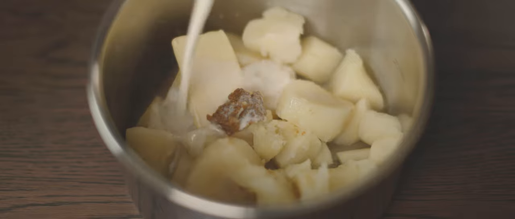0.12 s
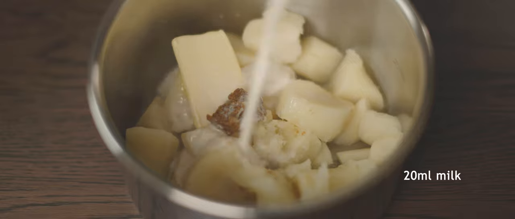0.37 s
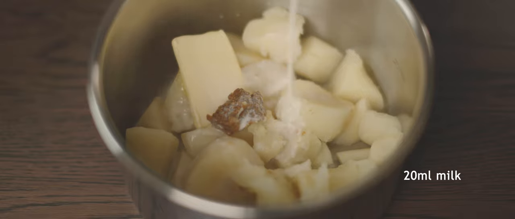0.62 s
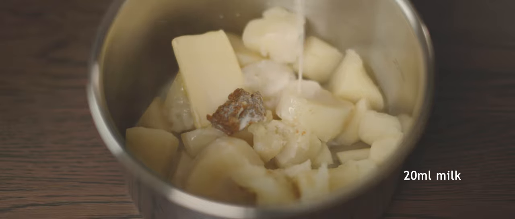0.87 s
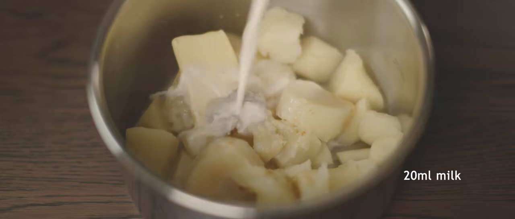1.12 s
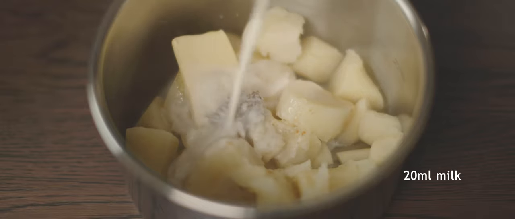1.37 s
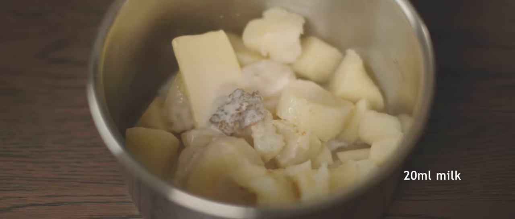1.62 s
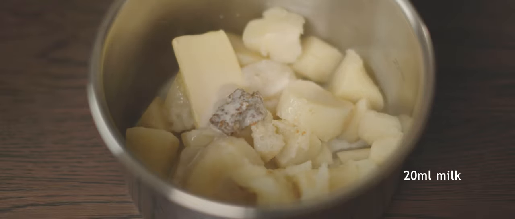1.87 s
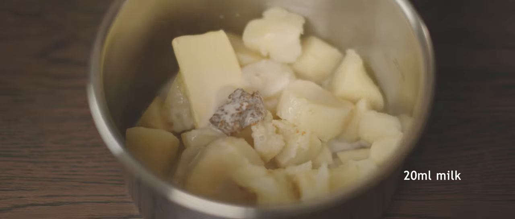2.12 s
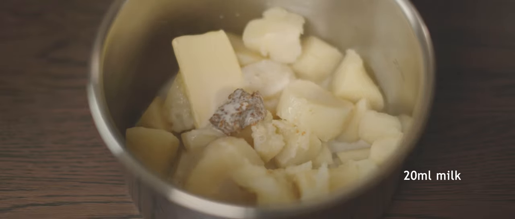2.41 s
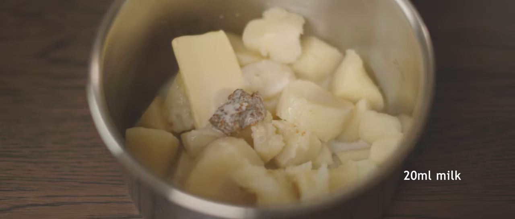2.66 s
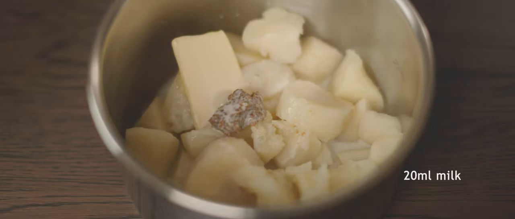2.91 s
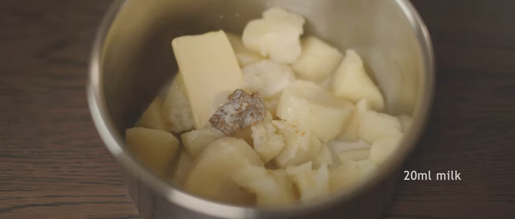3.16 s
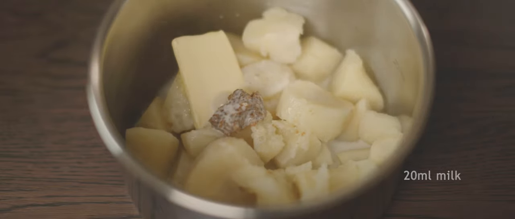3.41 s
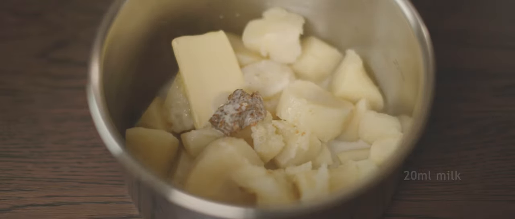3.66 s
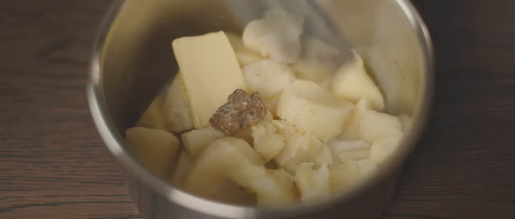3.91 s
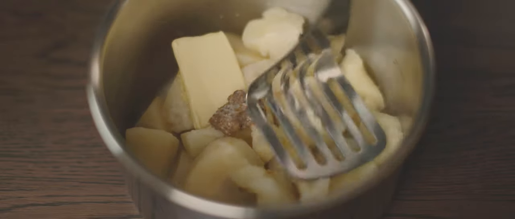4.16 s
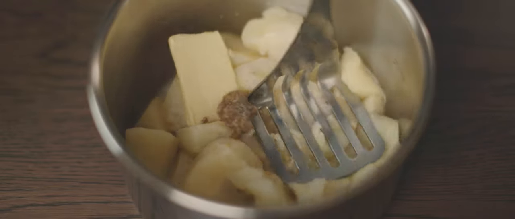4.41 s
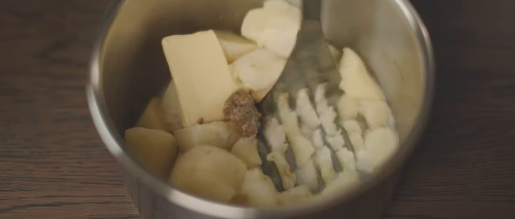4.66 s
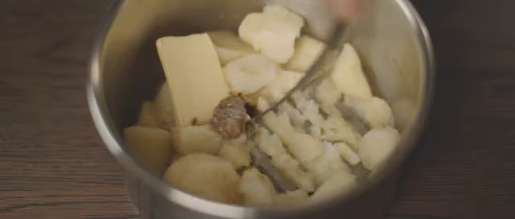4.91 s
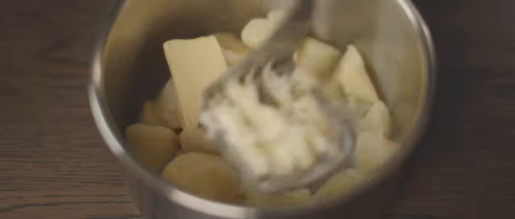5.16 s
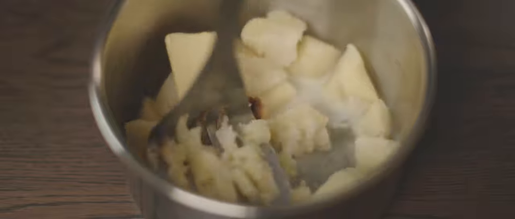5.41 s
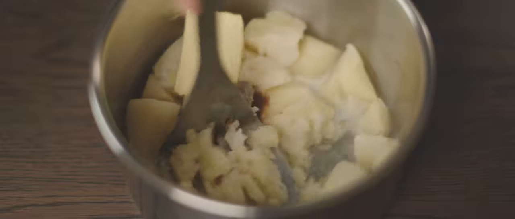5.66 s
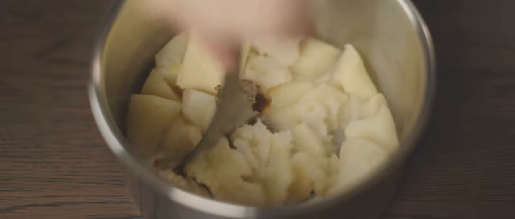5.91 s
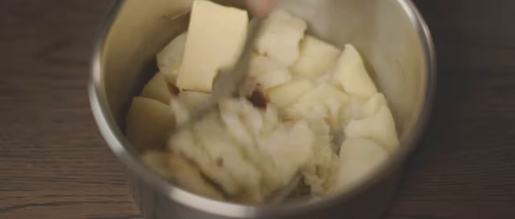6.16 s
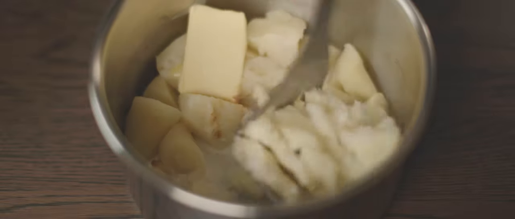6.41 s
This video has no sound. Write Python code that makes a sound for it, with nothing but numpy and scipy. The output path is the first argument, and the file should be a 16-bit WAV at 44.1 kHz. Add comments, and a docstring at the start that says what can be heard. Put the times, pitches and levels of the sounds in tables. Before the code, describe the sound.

Close, mono, in a small kitchen with soft air, hiss and low rumble. A faint steady appliance tone around the low mids is heard until about 3.7 s. From 0.1 to 0.9 s milk trickles onto soft boiled vegetables in a steel saucepan: bright ringing plips, fine wet crackle and tiny snaps. A sparser trickle follows from 1.1 to 1.8 s, with dull bumps from 1.6. From 2.2 to 3.6 s things shuffle on the wooden table, dull and scratchy, with a distinct knock at 3.15. It is nearly quiet until faint wet ticks from 4.2. At 4.7 s a masher strikes the pan with a very loud crack and table boom, then scrapes and squashes until 5.2. A lighter tap comes at 5.28, a ringing clank at 5.48, and wet squishing leads to a strong, bassier knock at 5.87. Soft squelches and scraping around 6.15 fade, with a faint thump at 6.4.

```python
"""Milk trickles over soft boiled vegetables in a steel saucepan: ringing bubbles, fine wet crackle and snapping films.
Then things are shuffled and knocked on the wooden table beside it: uneven noise, dull in its body, scratchy on top.
Then a slotted masher knocks the pan, making cracks, ringing modes and noisy tails, scrapes its wall and squashes
the vegetables with more bubbles, while jolts make the table boom. Air, hiss and a low rumble run throughout
in the small kitchen; a faint appliance tone is mostly heard early. Close and mono."""
import sys
import numpy as np
from scipy import signal
from scipy.fft import rfft, irfft
from scipy.io import wavfile

SR = 44100
rng = np.random.default_rng(int(sys.argv[2]) if len(sys.argv) > 2 else 0)


def unload_wav(signal):
    """Save mono or channel-first audio to the path in sys.argv[1] as 16-bit WAV at rate SR, clipped to [-1, 1]."""
    wavfile.write(
        sys.argv[1],
        SR,
        np.round(np.clip(np.atleast_2d(signal).T, -1, 1) * 32767).astype(np.int16),
    )


def boost_factor(decibels):
    """Convert a level in decibels to a linear amplitude factor."""
    exponent = np.asarray(decibels, float) / 20
    return 10 ** exponent


N = 288855
TIME = np.arange(N) / SR

# gushes of fine wet crackle, from trickling milk and squashed mash; a fall of 0 or less is immediate:
# peak_s, level_db, rise_s (per 20 dB), fall_s (per 20 dB)
GUSHES = [(0.144, -51.5, .03, .09), (0.252, -37.5, 0.081, 0.0538), (0.32, -47.5, .1, .015),
          (0.375, -49, .04, 0.01), (0.4, -35.5, 0.015, .012), (0.453, -36.5, 0.0025, 0.0171),
          (0.565, -41, 0.027, 0.03), (0.638, -49.5, 0.072, .035), (1.11, -48.5, .04, 0.05),
          (1.218, -56, 0.037, .08), (1.392, -56, 0.17, -0.1), (1.5, -56.5, 0.23, 0),
          (1.592, -40.5, 0.078, 0.06), (1.638, -37, 0.0063, .09), (4.532, -58.5, .12, 0.1),
          (4.636, -54, .035, 0.16), (5.726, -60, 0.13, 0.1), (5.818, -42, 0.063, .02),
          (6.126, -50.5, 0.18, .025), (6.176, -40, 0.036, .01)]
# ways the pan rings: pitch_hz, level_db, t60_s (time to fade 60 dB)
PAN_MODES = [(1041, -6, 0.5), (1380, -12, .25), (1760, -6, 0.2), (2300, -7, .15), (2450, -5.5, 0.29),
             (3360, 1.5, .2), (3650, -8.5, .15), (3990, -9.5, .25), (4500, -0.5, 0.1), (4920, -4, 0.35),
             (5313, -13.5, .3), (5680, -3, 0.16), (6330, -6.5, 0.41), (6460, -5.5, 0.23), (7000, -13.5, .2),
             (7800, -3.5, 0.11), (8473, -17.5, 0.21), (8900, -10.5, .25), (10340, -9, 0.15),
             (12400, -14, .14)]
# ways the masher blade rings: pitch_hz, level_db, t60_s
BLADE_MODES = [(1284, 8.5, 0.027), (623.6, -13, 0.074), (792, -5.5, 0.049), (954, -3.5, 0.046),
               (1680, -9.5, 0.015), (2296, -10, 0.033)]


def pops():
    """Each larger bubble rings like a small spring, with a wet splat round its pitch; films snap on top."""
    # larger bubbles bursting as milk lands, then in the mash; levels before the cuts below:
    # start_s, level_db, pitch_hz, cycles (ringing before it fades to about a third, at most 6 used)
    bubble_rows = [(0.1276, -40, 3070, 3), (0.143, -31, 5370, 2), (0.1445, -33, 3040, 8),
                   (0.154, -23.5, 4700, 2.1), (0.188, -29.5, 2400, 9.7), (0.2074, -23.5, 4200, 4),
                   (0.2377, -23, 2700, 1.6), (0.244, -24, 2410, 3.3), (0.2853, -29.5, 1860, 12),
                   (0.328, -32, 4230, 4), (0.351, -28.5, 3080, 3.2), (0.3647, -28, 2360, 1.9),
                   (0.3856, -31, 2300, 1.5), (0.398, -12, 2350, 7.7), (0.4532, -15.5, 3060, 2.6),
                   (0.528, -29.5, 6140, 6.7), (0.552, -20, 6130, 1.9), (0.5583, -28.5, 1690, 7.3),
                   (0.6023, -21, 3760, 11), (0.6305, -18.5, 3010, 10.4), (0.656, -18.5, 7000, 4.6),
                   (0.6997, -32.5, 5140, 4.3), (0.836, -40, 7700, 4.8), (0.8693, -14, 7340, 8.9),
                   (1.07, -34, 5800, 2), (1.095, -29, 6600, 6.3), (1.1266, -34.5, 2850, 3.1),
                   (1.1738, -43, 4130, 4), (1.1887, -42, 3560, 5.3), (1.2107, -36, 1700, 1.1),
                   (1.264, -36.5, 6270, 1.7), (1.277, -43.5, 1580, 4.8), (1.317, -40, 2050, 5.8),
                   (1.341, -34, 6440, 4), (1.3444, -40.5, 3460, 4.3), (1.3796, -33, 6600, 6.6),
                   (1.442, -34.5, 2450, 8.4), (1.51, -27.5, 6100, 2.1), (1.526, -31, 2420, 8),
                   (1.549, -28, 1380, 4), (1.5765, -19.5, 2720, 6.5), (1.592, -33, 1105, 7),
                   (1.6377, -25, 2000, 6.2), (1.6467, -37, 2090, 6.9), (1.6756, -25, 1860, 3.9),
                   (1.691, -24, 2820, 6.1), (1.7073, -19.5, 1187, 3.6), (1.8496, -20, 3130, 2.1),
                   (4.2306, -41, 3400, 3), (4.2707, -37.5, 5400, 1.4), (4.4423, -41.5, 4600, 3.5),
                   (4.4965, -37, 4570, 3.5), (4.527, -28.5, 5530, 4.4), (4.5367, -31.5, 5600, 3.9),
                   (4.5505, -42.5, 3300, 3), (4.6084, -40, 5450, 3.5), (4.6322, -25, 5500, 7.5),
                   (4.835, -27, 4020, 2.5), (4.872, -23, 4600, 3.5), (4.8994, -25, 6440, 4.4),
                   (4.927, -23.5, 2020, 1.8), (5.0038, -20, 5050, 1.2), (5.0686, -27.5, 6370, 3.1),
                   (5.0973, -44, 2660, 4.3), (5.1492, -40, 4770, 4), (5.162, -35.5, 6260, 4.3),
                   (5.1893, -43, 4660, 2.1), (5.686, -35.5, 3880, 4.5), (5.706, -33, 4670, 3.5),
                   (5.7225, -29, 6300, 2.7), (5.7413, -30.5, 3360, 3.5), (5.7688, -26, 6550, 2.3),
                   (5.8, -27.5, 4600, 3.5), (5.816, -24, 6300, 2.8), (6.0546, -30, 4260, 2.3),
                   (6.0866, -36.5, 3150, 5.2), (6.118, -31.5, 2450, 3.8), (6.1712, -20.5, 1690, 3.5),
                   (6.336, -42, 3020, 1.4)]
    # tiny treble ticks, from wet films snapping and from the bright edge of contacts:
    # start_s, peak_db, centre_hz
    tick_rows = [(0.117, -38, 15200), (0.1536, -37, 8810), (0.2053, -34, 8790), (0.2264, -36, 8600),
                 (0.25, -29, 9400), (0.18, -41, 10900), (0.3252, -40, 12700), (0.3506, -40, 10700),
                 (0.3655, -25.5, 11200), (0.375, -33, 12000), (0.4155, -40, 11000), (0.4704, -46, 8000),
                 (0.646, -40, 11000), (0.7847, -43, 9000), (0.5572, -42, 8590), (0.578, -24.5, 9300),
                 (0.6052, -20.5, 15000), (0.6969, -28, 14600), (0.8365, -39.5, 8550), (0.8688, -16, 9000),
                 (1.1267, -34, 9440), (1.223, -30, 11200), (1.3384, -34.5, 10000), (1.4447, -41, 9680),
                 (1.4975, -38, 12400), (1.5499, -31, 11900), (1.6794, -30, 9150), (1.804, -40, 9360),
                 (2.8443, -36, 9590), (3.1494, -33.5, 9860), (3.2296, -36, 8500), (3.4815, -42, 10000),
                 (4.378, -47.5, 12300), (4.432, -45.5, 15300), (4.4993, -35.5, 9300), (4.677, -40.5, 8690),
                 (4.688, -33, 10100), (4.6992, -11.5, 9550), (4.78, -35, 9000), (4.819, -34.5, 9260),
                 (4.835, -18, 11500), (4.8704, -36.5, 9290), (4.8918, -36.5, 9570), (4.972, -35, 8640),
                 (5.006, -32.5, 12900), (5.032, -38.5, 11500), (5.2767, -24, 9260), (5.479, -13, 10400),
                 (5.533, -34, 9100), (5.5778, -38.5, 11200), (5.596, -26, 10600), (5.6636, -40, 12700),
                 (5.7404, -36, 13000), (5.7718, -33.5, 8300), (5.782, -33, 10200), (5.811, -35.5, 9500),
                 (5.8163, -35.5, 9460), (5.8732, -18, 9240), (6.0542, -41, 8580), (6.1026, -42.5, 10830),
                 (6.1714, -39, 8500), (6.4035, -35.5, 13700), (6.4821, -39, 11520), (6.5362, -39, 12350)]
    lead_s = 0.0003  # every sound starts slightly ahead of its listed time
    out = np.zeros(N)
    for start_s, level_db, pitch_hz, cycles in bubble_rows:
        tone = bubble(pitch_hz, min(cycles, 6), glide=0.014, samples=int(0.033 * SR))
        splat = snap(0.002, 0.9 * pitch_hz, 1.67 * pitch_hz)
        add(out, start_s - lead_s, boost_factor(level_db - 8) * tone / np.abs(tone).max())
        add(out, start_s - lead_s, boost_factor(level_db - 11.5) * splat)
    for start_s, peak_db, centre_hz in tick_rows:
        tick = snap(0.00016, 0.82 * centre_hz, 1.235 * centre_hz)
        add(out, start_s - lead_s, boost_factor(peak_db) * tick)
    return out


def trickle(count=20000):
    """Swarms of tiny bubbles of many sizes ring together, a few much louder; some chirp upward."""
    # relative loudness of tiny bubbles by size: pitch_hz, level_db
    fizz = [(650, -22), (1200, -16.5), (2000, -6.5), (2800, 1), (4500, -3), (8000, -3.5), (15000, -14.5)]
    when, size, loudness, length, chirp = rng.random((count, 5)).T
    pitch_hz = 650 * 23 ** size
    span = np.arange(600)  # samples in one bubble
    starts = (when * (N - len(span))).astype(int)
    fizz_hz, fizz_db = np.transpose(fizz)
    level_db = np.interp(np.log(pitch_hz), np.log(fizz_hz), fizz_db)
    level_db = level_db - 3.2 * np.log(.015 + loudness)  # a few are much louder
    cycles = 1.5 + 6.0 * length[:, None] ** 2
    glide = .05 * chirp[:, None] ** 2
    fade = np.cos(np.pi / 2 * span / len(span))
    tones = bubble(pitch_hz, cycles, glide, samples=len(span)) * boost_factor(level_db)[:, None] * fade
    swarm = np.bincount((starts[:, None] + span).ravel(), tones.ravel(), N)
    return swells(GUSHES) * unit(swarm)


def small_ticks(count=260):
    """Wet films snap at random as tiny bursts of treble, louder where the crackle is."""
    out = np.zeros(N)
    wet = swells(GUSHES) / boost_factor(-50)  # 1 where the crackle is at -50 dB
    for when, size, pitch in rng.random((count, 3)):
        gain = boost_factor(-45 - 7.5 * size) * wet[int(when * N)] ** 0.4
        tick = snap(0.0002, 7000 * 1.8 ** pitch, 11000 * 1.8 ** pitch)
        add(out, when * N / SR, gain * tick)
    return out


def rubs_and_bumps():
    """Uneven noise with a dull body and a gritty scratch for rubbed or knocked wood; dull bumps ring briefly."""
    # rubbing strokes, and the noisy tail of a knock on the table at 3.155; a fall of 0 or less is immediate:
    # peak_s, body_db, rise_s (per 20 dB), fall_s (per 20 dB), scratch_above_body_db
    wood_swells = [(1.57, -47, 0.053, -0.01, 0), (1.62, -43, .03, 0.25, -17),
                   (1.708, -36.5, .006, .05, -21), (1.848, -41.5, 0.0073, 0.03, -11),
                   (2.0, -65.5, .1, 0.2, 11), (2.09, -64.5, 0.09, -0.1, 8.5),
                   (2.176, -45, 0.0072, 0.15, -8), (2.225, -54, 0.038, -0.16, 4.5),
                   (2.284, -40, 0.033, 0.05, -10), (2.365, -42, .03, .04, -5),
                   (2.404, -36.5, .04, 0.07, -7.5), (2.5, -33, 0.03, 0.03, -8.5),
                   (2.54, -35.5, .014, 0.06, -10), (2.66, -42, 0.18, 0.04, -11.5),
                   (2.736, -40.5, .045, -0.04, -26), (2.86, -46.5, 0.31, 0.16, 0.5),
                   (2.905, -39, .02, .06, -22), (2.94, -39.5, .04, .09, -18),
                   (3.036, -47, 0.089, 0.03, -16), (3.155, -31, 0.0022, .065, -13),
                   (3.2, -39, 0.024, 0.03, -17), (3.236, -40, 0.028, 0.0439, 10.5),
                   (3.254, -32, 0.024, 0.0064, -10), (3.31, -34.5, 0.054, 0.0338, -2.5),
                   (3.36, -52, 0.08, 0.53, -2.5), (3.514, -50, 0.062, .12, -24),
                   (3.598, -47, 0.096, 0.31, -13), (3.794, -55.5, 0.03, 0.11, -8),
                   (4.1, -66.5, 0.42, 0.55, 1.5)]
    # tone colour of the dull body: frequency_hz, level_db
    body_colour = [(65, -48.5), (110, -19), (149, -7), (205, -12), (273, 2), (370, -2), (421, -1),
                   (456, -9), (891, -0.5), (1530, -9), (2400, -10), (2680, -16), (5000, -31.5), (6500, -48),
                   (11000, -120)]
    # tone colour of the scratch: frequency_hz, level_db
    scratch_colour = [(880, -11), (1500, -6.5), (1980, -7.5), (2800, -3), (3480, -7), (3810, -5),
                      (5600, -8), (13700, -31), (16000, -37)]
    # small dull bumps: among the strokes, the table knock at 3.149, and the low body under two late
    # pan knocks: start_s, ring_peak_db, pitch_hz
    bumps = [(1.586, -28.5, 444), (1.786, -42, 566), (2.172, -42, 342), (2.276, -37, 663),
             (2.399, -37, 1100), (2.419, -51, 824), (2.535, -30.5, 820), (2.639, -40.5, 880),
             (2.898, -38.5, 830), (3.149, -22, 1000), (3.592, -41, 350), (3.762, -42.5, 211),
             (5.481, -26, 349), (5.875, -19, 255.4)]
    body = unit(colour(grains(per_s=530, spread_db=3.5, smear_s=0.0037), body_colour))
    scratch = unit(colour(grains(per_s=700, spread_db=3.5, smear_s=0.0042), scratch_colour))
    out = swells(wood_swells) * body + swells(wood_swells, above=True) * scratch
    for start_s, peak_db, hz in bumps:
        tone = ring([(hz, 0, .04), (1.78 * hz, -6, .025)], length_s=.1, push_s=0.00023)
        add(out, start_s, boost_factor(peak_db) * tone)
        add(out, start_s, boost_factor(peak_db + 3) * snap(0.0037, low_hz=0.79 * hz, high_hz=3.37 * hz))
    return out


def knocks():
    """A blow gives a crack, a short blade clack, a ringing pan wall and a dense clank dying away."""
    # knocks: start_s, crack_peak_db, low_hz (bass thins out below it),
    # blade_db (against the crack), pan_db (against the crack)
    blows = [(4.683, -27.5, 900, -3, -44), (4.6981, 0, 148, -2, -32.5), (5.2759, -23, 2530, -34, -29),
             (5.4807, -5.5, 1170, -3, -7), (5.8436, -14, 1540, -29.5, -37), (5.874, -4.5, 152, -16, -29.5)]
    # tone colour of a blow before tilting: frequency_hz, level_db
    blow_colour = [(88, -64.5), (150, -1.5), (186, -14), (259, 6), (376, 5), (460, -3), (1240, -5.5),
                   (1480, -8.5), (2180, -15), (2760, -16), (4490, -16), (5050, -17.5), (7180, -21),
                   (8560, -28), (16000, -56.5)]
    out = np.zeros(N)
    t = np.arange(int(.6 * SR)) / SR
    rattle = grains(per_s=660, spread_db=2.5, smear_s=0.0053)
    # the pan is not quite round, so every mode is a close, beating pair
    pairs = PAN_MODES + [(hz * 1.007, level - 6.5, t60) for hz, level, t60 in PAN_MODES]
    blade_hz = np.transpose(BLADE_MODES)[0]
    for start_s, crack_db, low_hz, blade_db, pan_db in blows:
        # the higher low_hz is, the more the blow leans to the treble (dB per octave about 1 kHz)
        tilt_db = 2 + 1.72 * np.log2(low_hz / 148)
        tilted = [(hz, level + tilt_db * np.log2(hz / 1000) - 12 * max(np.log2(low_hz / hz), 0))
                  for hz, level in blow_colour]
        strike = (1 - np.exp(-t / .0004)) * np.exp(-t / 0.0022)
        crack = colour(rng.standard_normal(len(t)) * strike, tilted)
        clank_t60_s = max(0.4 + 0.04 * crack_db, .05)  # stronger blows clank longer
        clank = unit(colour(np.roll(rattle, int(start_s * SR))[:len(t)], tilted))
        clank = clank * 1000 ** (-t / clank_t60_s)
        add(out, start_s, boost_factor(crack_db) * (crack / np.abs(crack).max() + boost_factor(-26.5) * clank))
        blade_gains = boost_factor(-18 * np.maximum(np.log2(low_hz / blade_hz), 0))
        clack = ring(BLADE_MODES, blade_gains, length_s=.2, push_s=.0002)
        add(out, start_s, -boost_factor(crack_db + blade_db) * clack)
        pan_gains = boost_factor(1.0 * rng.standard_normal(len(pairs)))  # each blow stirs the modes differently
        add(out, start_s, boost_factor(crack_db + pan_db) * ring(pairs, pan_gains, length_s=.6))
    return out


def scrapes_and_tails():
    """Rough contacts stir the damped modes of pan and blade, with hiss: scrapes, and noisy tails after knocks."""
    # the masher sliding along the pan wall, and noisy tails after knocks:
    # peak_s, ringing_db, rise_s (per 20 dB), fall_s (per 20 dB), hiss_above_ringing_db
    pan_swells = [(4.84, -46.5, 0.0055, 0.01, -3), (4.872, -31, 0.0036, 0.0184, -19.5),
                  (4.905, -38, 0.024, 0.09, -14.5), (4.926, -35, 0.041, .06, -17.5),
                  (4.975, -39.5, .04, 0.0364, -12), (5.03, -62, 0.12, 0.25, 5.5),
                  (5.124, -57, 0.082, .05, -9), (5.17, -69.5, 0.054, 0.2, 4), (5.5, -50, .01, 0.19, -2),
                  (5.6, -52.5, .03, 0.11, 4), (5.9, -45, .02, 0.11, -2), (6.0, -60, 0.049, 0.36, -20.5),
                  (6.06, -66, .05, 0.2, 4), (6.13, -56.5, .14, 0.1, -4), (6.176, -43, 0.063, 0.0345, -7.5),
                  (6.2, -57.5, .03, 0.24, 1.5)]
    damped_modes = [(hz, db, .03 * t60 + .003) for hz, db, t60 in PAN_MODES + BLADE_MODES]
    damped = ring(damped_modes, length_s=.1)
    contacts = grains(per_s=480, spread_db=2.5, smear_s=0.0018)
    wall = unit(signal.fftconvolve(contacts, damped)[:N])
    hiss_colour = [(2000, -11.0), (4500, -4.5), (9000, -11.0), (16000, -21.5)]  # Hz, dB
    hiss = unit(colour(grains(per_s=2500, spread_db=4.5, smear_s=0.00089), hiss_colour))
    return swells(pan_swells) * wall + swells(pan_swells, above=True) * hiss


def thumps():
    """Jolts sway the table on its legs with a slow boom, and its top thuds, each jolt adding its own pitch."""
    # jolts that reach the table: start_s, boom_peak_db, thud_peak_db, thud_pitch_hz
    jolts = [(1.59, -76, -39.5, 131), (1.65, -74, -37, 143), (1.697, -74, -44, 196), (3.762, -54, -39, 134),
             (4.695, -29, -29, 107), (5.273, -66, -38, 111.4), (5.478, -49, -42.5, 205),
             (5.873, -30, -27.5, 129.5), (6.401, -60.5, -48.5, 110.2)]
    # ways the table sways: pitch_hz, level_db, t60_s
    sway_modes = [(32, 4, .9), (45, -16.5, 0.26), (55, -2.5, .3)]
    # ways the table top rings: pitch_hz, level_db, t60_s
    top_modes = [(78.6, -1.5, 0.55), (250, -4, 0.17), (346, -5, .08)]
    out = np.zeros(N)
    for start_s, boom_db, thud_db, hz in jolts:
        thud = ring(top_modes + [(hz, 3, 40 / hz)], length_s=.6, push_s=0.00087)
        add(out, start_s, boost_factor(boom_db) * ring(sway_modes, push_s=0.034))
        add(out, start_s, boost_factor(thud_db) * thud)
    return out


def swishes():
    """Bands of noise make soft breaths of hiss that swell and fade smoothly."""
    # soft airy swishes: middle_s, half_length_s, centre_hz, width_hz, level_db
    breaths = [(2.861, .07, 6000, 7000, -56.5), (3.70, .09, 11500, 1500, -65), (3.95, .07, 7040, 2980, -62),
               (5.047, .13, 11530, 900, -69), (6.2, .1, 11540, 1460, -64.5)]
    out = np.zeros(N)
    for middle_s, half_s, hz, width_hz, level_db in breaths:
        band = signal.butter(2, [hz - width_hz / 2, hz + width_hz / 2], "band", fs=SR, output="sos")
        hiss = unit(signal.sosfilt(band, rng.standard_normal(N)))
        out += boost_factor(level_db) * np.exp(-((TIME - middle_s) / half_s) ** 2) * hiss
    return out


def background():
    """Coloured noise makes air, hiss and a low rumble; a sine makes one thin appliance tone."""
    # tone colour of kitchen air and microphone hiss: frequency_hz, level_db
    air_colour = [(32, -39), (55, -14), (185, -11), (241, -6.5), (278, -8.5), (336, -15.5), (417, -13.5),
                  (671, -17), (738, -18), (1190, -22), (1280, -23), (2870, -29), (7800, -32.5),
                  (15200, -36.5), (16300, -53)]
    # loudness of that air and hiss: time_s, level_db
    air_level = [(0, -60.5), (1.5, -61), (3.7, -58), (3.9, -58), (5, -62), (6.55, -62.5)]
    # swells of the rumble: peak_s, level_db, rise_s (per 20 dB), fall_s (per 20 dB)
    rumble_swells = [(2.21, -71, 2, 0.78), (3.89, -66, .4, 2.5), (4.9, -45, 0.23, 0.15),
                     (5.87, -55.5, .22, .55), (6.55, -59, 0.48, .5)]
    # loudness of the appliance tone: time_s, rms_db
    tone_level = [(0, -53), (1.57, -55.5), (1.62, -59), (3.7, -61.5), (3.78, -91), (6.55, -82)]
    air = boost_factor(curve(air_level)) * unit(colour(rng.standard_normal(N), air_colour))
    rumble_colour = [(15, -14.5), (30, 12.5), (50, 14.5), (90, -25.5)]  # Hz, dB
    rumble = unit(colour(rng.standard_normal(N), rumble_colour))
    rumble = (boost_factor(-81) + swells(rumble_swells)) * rumble  # -81 dB: the rumble never stops
    tone = np.sqrt(2) * boost_factor(curve(tone_level)) * np.sin(2 * np.pi * 335.7 * TIME)
    return air + rumble + tone


def room(x):
    """Adds dense reflections from the kitchen; the treble dies sooner."""
    low_t60_s, treble_t60_s, level_db = 0.27, 0.15, -13.5
    t = np.arange(int(.6 * SR)) / SR
    low = signal.sosfilt(signal.butter(1, 2500, fs=SR, output="sos"), rng.standard_normal(len(t)))
    bright = .5 * rng.standard_normal(len(t))
    tail = low * 1000 ** (-t / low_t60_s) + bright * 1000 ** (-t / treble_t60_s)
    tail *= 1 - np.exp(-t / 0.00091)  # reflections build up just after the direct sound
    tail = signal.sosfilt(signal.butter(2, 200, "high", fs=SR, output="sos"), tail)
    tail /= np.sqrt(np.sum(tail ** 2))
    return x + boost_factor(level_db) * signal.fftconvolve(x, tail)[:N]


def bubble(hz, cycles, glide, samples):
    """A bubble rings a few cycles and glides up as it opens; rows for many bubbles."""
    turns = np.multiply.outer(hz, np.arange(samples) / SR)
    life = turns / np.maximum(cycles, 1)
    swing = np.sin(2 * np.pi * turns * (1 + glide * life))
    return (1 - np.exp(-turns / 2.6)) * np.exp(-life) * swing


def ring(modes, gains=1, length_s=1., push_s=0):
    """A struck body: fading sines, peak 1; a soft contact pushes longer and dulls the onset."""
    t = np.arange(int(length_s * SR))[:, None] / SR
    hz, db, t60_s = np.transpose(modes)
    sines = np.sin(2 * np.pi * hz * t) * np.exp(-np.log(1000) * t / t60_s)
    y = sines @ (boost_factor(db) * gains)
    y = np.convolve(y, np.hanning(int(push_s * SR) + 3))
    return y / np.abs(y).max()


def snap(decay_s, low_hz, high_hz):
    """A burst of band noise that dies at once, peak 1."""
    t = np.arange(int(10 * decay_s * SR) + 60) / SR
    burst = rng.standard_normal(4096)[:len(t)] * np.exp(-t / decay_s)
    edges = np.clip([low_hz, high_hz], 20, .45 * SR)
    y = signal.sosfilt(signal.butter(2, edges, "band", fs=SR, output="sos"), burst)
    return y / np.abs(y).max()


def grains(per_s, spread_db, smear_s):
    """Random contacts, a few much bigger than the rest, each a short puff of noise; rms 1."""
    sizes = boost_factor(spread_db * np.minimum(rng.exponential(size=N), 3.7))
    hits = (rng.random(N) < per_s / SR) * sizes
    power = signal.lfilter([1], [1, -np.exp(-1 / (smear_s * SR))], hits ** 2)
    return unit(np.sqrt(power + 1e-9) * rng.standard_normal(N))


def swells(rows, above=False):
    """Gain of gestures that rise to a peak and fall away, straight in dB; powers add."""
    power = np.full(N, 1e-14)
    for peak_s, db, rise_s, fall_s, *extra_db in rows:
        rising = (peak_s - TIME) / max(rise_s, 1e-3)
        falling = (TIME - peak_s) / max(fall_s, 1e-3)
        drop_db = 20 * np.maximum(rising, falling)
        power += boost_factor(2 * (db + above * sum(extra_db) - drop_db))
    return np.sqrt(power)


def colour(x, points):
    """Filters a sound through (Hz, dB) points without ringing ahead of it."""
    hz, db = np.transpose(points)
    grid = np.maximum(np.fft.rfftfreq(8192, 1 / SR), 1)
    cep = irfft(np.log(boost_factor(np.interp(np.log(grid), np.log(hz), db))))
    # folding the cepstrum (spectrum of the log spectrum) puts all the response after time zero
    cep[1:4096] *= 2
    cep[4097:] = 0
    return signal.fftconvolve(x, irfft(np.exp(rfft(cep))))[:len(x)]


def curve(rows):
    """A table of (s, value) as a value per sample."""
    return np.interp(TIME, *np.transpose(rows))


def unit(x):
    """Scale to rms 1."""
    return x / np.sqrt(np.mean(x ** 2))


def add(out, start_s, sound):
    """Mix a short sound in at its start time."""
    i = int(start_s * SR)
    out[i:i + len(sound)] += sound[:len(out) - i]


def scene():
    """Everything near the pan sounds in the kitchen, over table thumps and the background."""
    near = pops() + small_ticks() + trickle() + rubs_and_bumps() + scrapes_and_tails() + swishes() + knocks()
    # things this small radiate no deep bass; that comes through the table
    near = signal.sosfilt(signal.butter(2, 90, "high", fs=SR, output="sos"), near)
    return (room(near) + thumps() + background())[None]


def top_cut(x):
    """Nothing passes above the cut-off."""
    return signal.sosfilt(signal.butter(12, 16480, fs=SR, output="sos"), x)


def record(dry):
    """Peaks beyond full scale are clipped flat."""
    mix = np.clip(dry, -1, 1)
    return top_cut(mix)


dry = scene()
out = record(dry)
unload_wav(out)
```